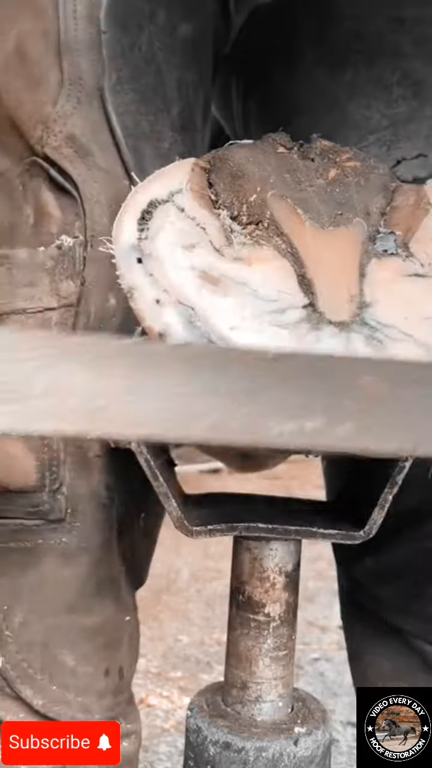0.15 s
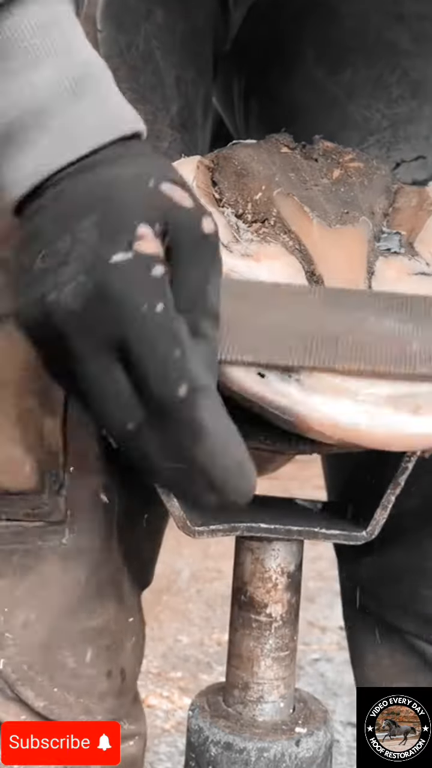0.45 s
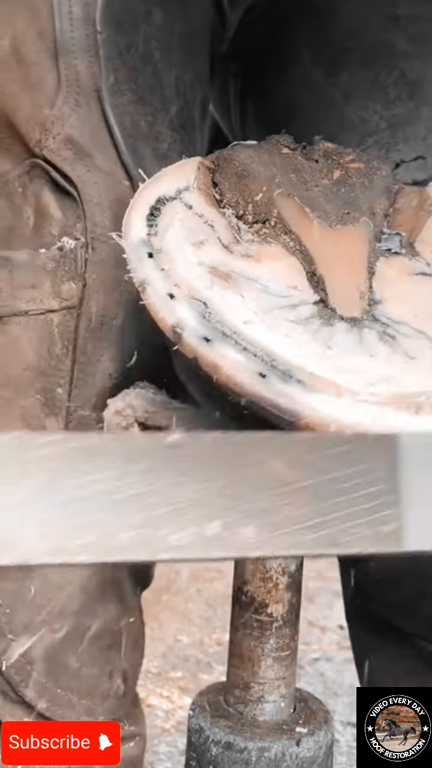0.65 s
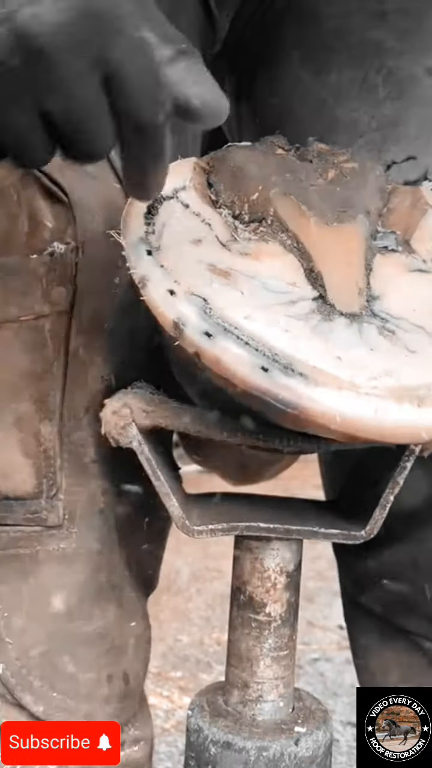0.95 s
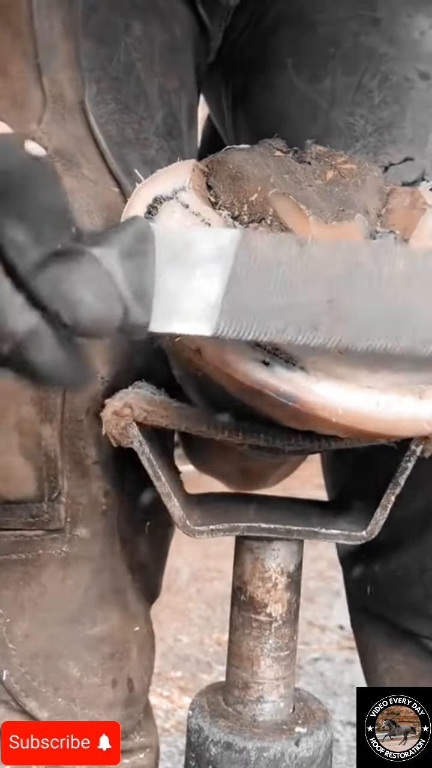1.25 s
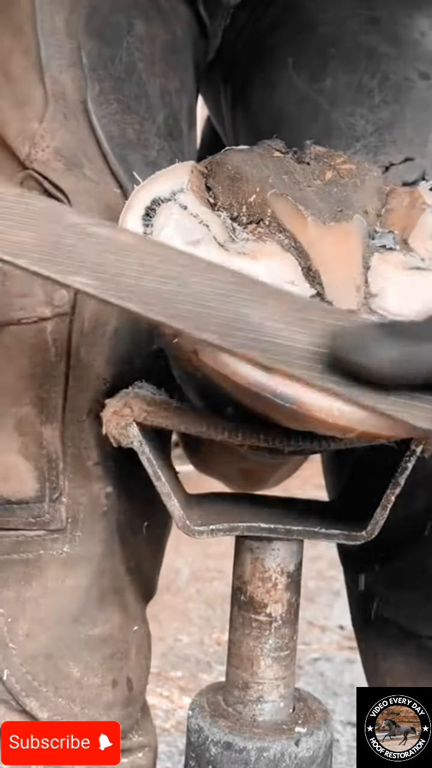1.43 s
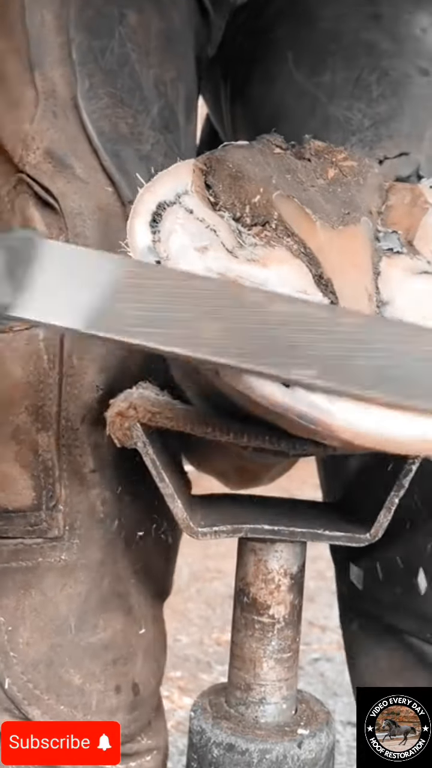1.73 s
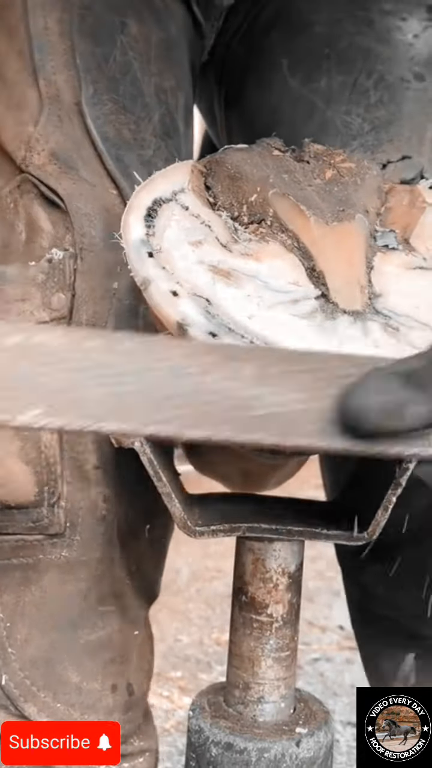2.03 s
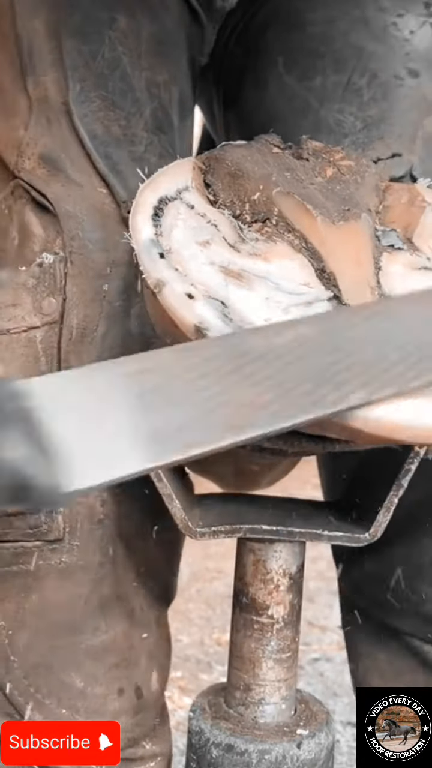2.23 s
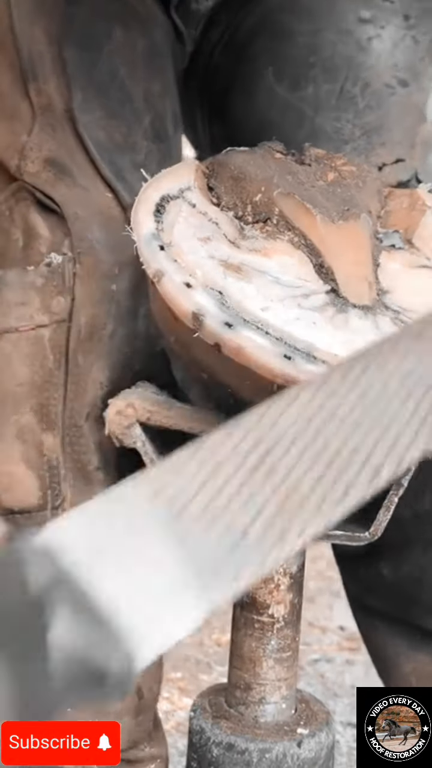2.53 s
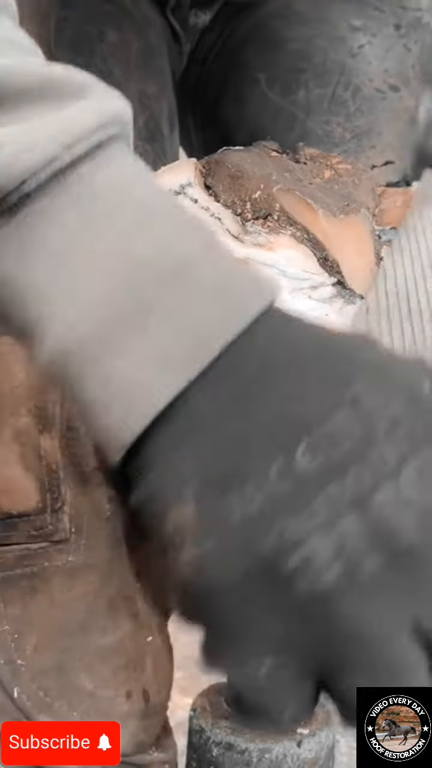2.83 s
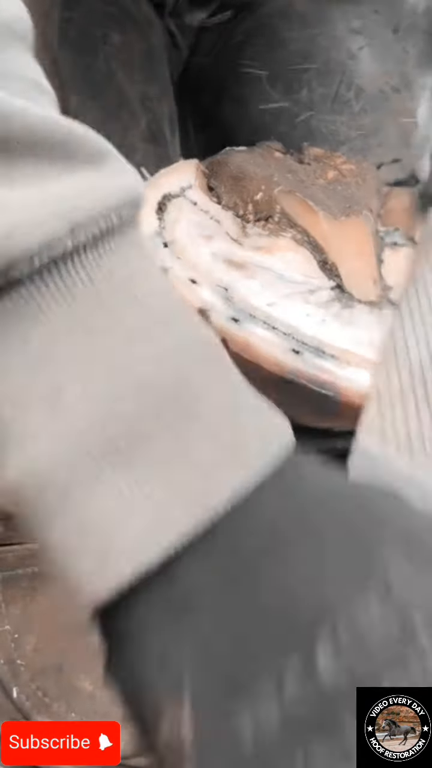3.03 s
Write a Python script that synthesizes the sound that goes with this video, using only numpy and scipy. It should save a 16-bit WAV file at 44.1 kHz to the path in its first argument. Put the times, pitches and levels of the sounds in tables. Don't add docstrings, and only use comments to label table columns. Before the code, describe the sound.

A metal rasp grates on a horse hoof, close and dry. Hard, bright, gritty pushes at 0.05 and 0.45 s stop abruptly, with a faint return between. Ticks from 0.9 s, a hoof knock near 1.25 and a singing draw with low wind follow. From 1.55 s pushes and lighter draws alternate, loudest at 2.2; teeth rattle at 2.4, scuffs at 3.1. Soft stand thuds, low barn rumble, thin warbly treble.

```python
import sys
import numpy as np
from scipy import signal
from scipy.fft import rfft, irfft, next_fast_len
from scipy.io import wavfile
from scipy.ndimage import uniform_filter1d, map_coordinates

SR = 44100
rng = np.random.default_rng(int(sys.argv[2]) if len(sys.argv) > 2 else 0)


def makeup_ratio(level_db):
    decades = np.asarray(level_db, float) / 20
    return 10 ** decades


def output_pcm(signal):
    pcm = np.clip(np.atleast_2d(signal).T, -1, 1) * 32767
    wavfile.write(sys.argv[1], SR, np.round(pcm).astype(np.int16))


N = 140238

# frequency [Hz], level [dB].
BARN_RUMBLE = [(22, -34), (70, -14.5), (120, -1.5), (180, 1), (350, -15.5), (560, -16.5), (720, -30)]
# centre [Hz], half width [Hz], lift [dB].
BARN_BOOMS = [(121.6, 2.85, 9.5), (161, 30, -0.5), (339.3, 29, 6.5)]
# frequency [Hz], level [dB per Hz].
AIR_SPECTRUM = [(500, -48), (850, -9), (983, -11), (1560, -11), (1900, -17.5), (3200, -26), (3830, -21.5),
                (15500, -40.5)]
# time [s], level [dB].
GUSTS = [(0.0, -64), (0.51, -70), (1.29, -48.5), (1.5, -44), (1.96, -59.5), (2.67, -69), (3.18, -55)]
# centre [s], level [dB], pitch [Hz], half length [s].
STAND_THUDS = [(.173, -31, 64.6, 0.013), (.165, -38, 165.2, 0.047), (.592, -32.5, 172.6, 0.016),
               (1.07, -42.5, 58.7, 0.042), (1.282, -32.5, 171, 0.012), (1.44, -37, 64, 0.012),
               (1.592, -25, 86.4, 0.015), (1.79, -39.5, 184, 0.034), (2.455, -33.5, 157, 0.023),
               (2.99, -37.5, 180, 0.017), (3.17, -45, 45, 0.028)]
# frequency [Hz], level [dB], decay t60 [s].
KNOCK_MODES = [(600, -42, .025), (840, -40.5, 0.029), (1070, -42, 0.024), (1400, -39, .022),
               (2000, -44, .012)]
# start [s], level [dB], centre [Hz], decay t60 [s].
TOUCHDOWNS = [(0.9012, -47.5, 3740, 0.036), (.905, -52, 3000, 0.044), (.916, -43.5, 4000, 0.031),
              (1.004, -60, 4000, .02), (1.188, -50, 2200, .03), (1.205, -50, 2300, 0.0074),
              (1.213, -42, 2370, 0.019), (1.27, -52, 1500, 0.017), (1.3, -50, 2200, 0.022),
              (1.3165, -44, 2600, .015), (2.093, -49.5, 1800, 0.026), (3.041, -41, 9000, .006),
              (3.061, -38, 3360, 0.023), (3.085, -33.5, 2920, 0.012), (3.102, -50, 2000, .01),
              (3.154, -43, 3000, .015)]
# start [s], level [dB], centre [Hz].
TOOTH_ROWS = [(2.396, -42, 4500), (2.4045, -39.5, 3305), (2.4127, -41, 3000), (2.4205, -34, 3950),
              (2.427, -35, 4560), (2.4344, -29.5, 6000), (2.4403, -28, 4300), (2.45, -31, 6006),
              (2.465, -32, 3540), (2.471, -27, 3310), (2.477, -34, 3610)]
# on [s], off [s], from [Hz], to [Hz], width [Hz],
# level against the rasp [dB].
BLADE_SINGS = [(0.046, 0.15, 3600, 4400, 900, -9.5), (.47, 0.58, 3670, 3950, 1100, -6),
               (1.28, 1.44, 2440, 2040, 200, -5), (1.31, 1.38, 3900, 3700, 250, -6),
               (1.38, 1.46, 5200, 5000, 360, -8.5), (1.333, 1.47, 9000, 8960, 320, -8.5),
               (1.62, 1.78, 8500, 9000, 260, -9), (1.89, 2.01, 4150, 5200, 1100, -12.5),
               (1.93, 2.16, 9400, 8200, 300, -15), (2.16, 2.13, 4800, 4300, 1400, -2),
               (2.2, 2.308, 3520, 3450, 440, -3.5), (2.27, 2.32, 2740, 2380, 310, -3.5),
               (2.679, 2.779, 3900, 3600, 670, -6), (1.579, 1.68, 640, 670, 300, -15),
               (1.29, 1.43, 340, 290, 99, -2)]
# time [s], tooth pressure [dB].
PUSHES = [
    [(0, -63.5), (.055, -40), (.1, -35.5), (.126, -36), (.133, -55.5), (.175, -52.5), (.19, -65.5),
     (.26, -69)],
    [(.43, -69), (.48, -44), (.53, -40), (.575, -43.5), (.61, -55.5), (.64, -73), (.75, -61.5), (.88, -84)],
    [(1.54, -73), (1.57, -53.5), (1.66, -39.5), (1.765, -35), (1.775, -44.5), (1.8, -68), (1.84, -67)],
    [(2.07, -69), (2.095, -59.5), (2.14, -41.5), (2.2, -32), (2.292, -31.5), (2.3, -45.5), (2.335, -53.5),
     (2.36, -68)],
    [(2.61, -73), (2.645, -49), (2.71, -38.5), (2.735, -36), (2.77, -39), (2.855, -46.5), (2.88, -73)],
    [(2.92, -75), (2.98, -51), (3.04, -50), (3.06, -49.5), (3.088, -50), (3.1, -71)],
]
# time [s], tooth pressure [dB].
DRAWS = [
    [(.26, -67), (.31, -56.5), (.35, -46.5), (.4, -60), (.425, -86)],
    [(1.07, -93), (1.12, -65), (1.19, -56.5), (1.225, -55.5), (1.25, -71)],
    [(1.26, -61), (1.3, -59), (1.34, -46.5), (1.45, -42), (1.49, -48.5), (1.515, -63)],
    [(1.85, -79), (1.88, -53.5), (1.93, -43), (1.98, -43.5), (2.04, -48), (2.062, -70)],
    [(2.37, -70), (2.4, -58.5), (2.44, -42.5), (2.47, -40), (2.51, -43), (2.585, -63), (2.61, -84)],
    [(3.13, -62), (3.15, -45.5), (3.18, -44)],
]
# body [dB], bite [dB], treble [dB].
STROKE_COLOURS = [(9.5, -4.5, 5), (9, -3.8, 5.5), (10.5, -3.5, 3.5), (3, -3.5, 3.5), (4, 1, 2),
                  (17.5, 4.5, 1.5), (16.5, 1.5, 1), (12, -5, 3), (12.5, -7, -1), (7, -10, -2.5),
                  (6.5, 0.5, 7.5), (6, -5.5, -2)]
# frequency [Hz], level [dB].
HORN_SPECTRUM = [(300, -9.5), (900, -16), (1400, -6.5), (2500, -0.25), (4000, 0), (5600, -10.5),
                 (9000, -12.5), (12500, -23)]
# centre [Hz], half width [Hz], lift [dB].
BLADE_MODES = [(1700, 250, 0), (2320, 140, 1.5), (3580, 110, 2), (5160, 600, 7), (8660, 120, 3),
               (12580, 640, 7)]
# frequency [Hz], likeness [-1 to 1].
PORT_LIKENESS = [(60, 0.86), (150, 0.95), (300, 0.8), (640, -0.49), (1400, 0.58), (3100, 0.78),
                 (6800, 0.56), (15000, 0.28)]
# frequency [Hz], left minus right [dB].
PORT_LEAN = [(60, 0.5), (130, -1.5), (290, -5), (640, -3), (1410, 0), (3100, -4), (6820, -2.0),
             (15000, 0.5)]
# centre [Hz], half width [Hz], gain [dB].
SPECTRUM_BUMPS = [(717.6, 46, -14.5), (5830, 330, -4.5), (9210, 62, 7.5), (11370, 80, -5)]
WHISTLE_HZ = (9819, 11197, 13954)
EMPTIED_HZ = (280, 550, 700)
# on [s], off [s], level against the rasp [dB].
WHISTLE_TIMES = [
    [(0.486, 0.873, -14), (1.274, 1.53, -15), (1.57, 1.784, -13), (1.86, 2.06, -16), (2.12, 2.32, -19),
     (2.43, 2.65, -23)],
    [(1.3, 1.53, -26), (2.19, 2.3, -18.5), (2.74, 3.183, -26)],
    [(.05, .4, -36), (.5, .88, -29), (.96, 1.16, -32), (1.43, 1.53, -38), (2.47, 2.6, -28),
     (2.66, 2.71, -36)],
]
# (from [s], to [s]).
TREBLE_GAPS = [([(5880, 6250), (11350, 11720)], [(.13, .76), (.95, 1.25), (1.31, 1.45), (1.6, 1.98),
               (2.13, 2.26), (2.46, 2.6), (2.65, 2.79), (2.87, 3.02), (3.07, 3.12)]), ([(5720, 5900)],
               [(.01, .89), (1, 1.11), (1.21, 2.07), (2.14, 2.38), (2.46, 2.79), (2.89, 3.17)]),
               ([(10000, 10700)], [(.17, .43), (.54, .6), (.63, .92), (1.03, 1.2), (1.25, 1.53),
               (1.58, 1.63), (1.66, 1.74), (1.81, 2.05), (2.12, 2.29), (2.47, 2.53), (2.65, 2.71),
               (2.76, 3.04)]), ([(14600, 15200)], [(.06, .41), (.5, .89), (1.49, 1.62), (1.82, 2.07),
               (2.51, 2.57)]), ([(15200, 15800)], [(.06, .89), (.96, 1.15), (1.19, 2.08), (2.14, 2.3),
               (2.45, 2.62), (2.78, 3.2)])]


def unit(x):
    return x / np.sqrt(np.mean(x ** 2) + 1e-20)


def noise():
    return rng.standard_normal((2, N))


def along(points, hz):
    f, v = np.transpose(points)
    below = -120 if v[0] < -15 else v[0]
    return np.interp(np.log(hz + 1), np.log(f + 1), v, below, v[-1])


def bumps(rows, hz):
    return makeup_ratio(sum(db * np.exp(-((hz - c) / w) ** 2) for c, w, db in rows))


def wobble(rate):
    knots = rng.standard_normal(int(N * rate / SR) + 4)
    return map_coordinates(knots, [np.arange(N) * rate / SR])


def filtered(x, response):
    m = next_fast_len(N + 8192)
    return irfft(rfft(x, m) * response(np.fft.rfftfreq(m, 1 / SR)), m)[..., :N]


def patchy(x, patch_db):
    z = signal.stft(x, nperseg=512)[2]
    field = rng.standard_normal(z.shape[-2:])
    for axis in (0, 1):
        field = uniform_filter1d(field, size=5, axis=axis)
    return signal.istft(z * makeup_ratio(patch_db * unit(field)), nperseg=512)[1][..., :N]


def barn():
    rumble = filtered(noise(), lambda hz: makeup_ratio(along(BARN_RUMBLE, hz)) * bumps(BARN_BOOMS, hz) * (hz < 715))
    rumble = unit(rumble)
    power = abs(uniform_filter1d(rumble ** 2, size=2400, axis=1))
    rumble = unit(rumble / power ** (0.35 / 2))
    air = patchy(noise(), patch_db=2.5)
    air = unit(filtered(air, lambda hz: makeup_ratio(along(AIR_SPECTRUM, hz)) * (hz > 860)))
    gust = unit(filtered(noise(), lambda hz: np.exp(-((hz - 58) / 22) ** 2)))
    s, db = np.transpose(GUSTS)
    gust_db = np.interp(np.arange(N) / SR, s, db) + 2.5 * wobble(9.25)
    return makeup_ratio(-45.5) * patchy(rumble, patch_db=1.5) + makeup_ratio(-64) * air + makeup_ratio(gust_db) * gust


def stand():
    t, out = np.arange(N) / SR, 0
    for s, db, hz, half in STAND_THUDS:
        bell = np.exp(-((t - s) / half) ** 2)
        out = out + makeup_ratio(db) * bell * np.sin(2 * np.pi * hz * (t - s) + 4.13)
    return out


def knock():
    t = np.maximum(np.arange(N) / SR - 1.2555, 0)
    return sum(makeup_ratio(db - 60 * t / t60) * np.sin(2 * np.pi * hz * t) for hz, db, t60 in KNOCK_MODES)


def ticks():
    out, t = np.zeros((2, N + SR)), np.arange(4096) / SR
    f = np.fft.rfftfreq(len(t), 1 / SR)
    row_t60_s = 0.0076
    for s, db, hz, t60 in TOUCHDOWNS + [(*row, row_t60_s) for row in TOOTH_ROWS]:
        patch = (f > 500) / (1 + ((f - hz) / (0.5 * hz)) ** 2)
        puff = irfft(rfft(rng.standard_normal((2, len(t)))) * patch)
        out[:, round(s * SR):][:, :len(t)] += makeup_ratio(db - 60 * t / t60) * unit(puff)
    return out[:, :N]


def singing(plain, teeth_per_s):
    t, out = np.arange(N) / SR, 0
    for on, off, from_hz, to_hz, width_hz, db in BLADE_SINGS:
        u = np.clip((t - on) / (off - on), 0, 1)
        strikes = rng.random((2, 2, N)) < 0.3 * teeth_per_s / SR
        strikes = rng.standard_normal((2, 2, N)) * strikes
        a, b = filtered(strikes, lambda hz: 1 / (1 + (2 * hz / width_hz) ** 2))
        turn = 2 * np.pi * np.cumsum(from_hz + (to_hz - from_hz) * u) / SR
        ring = unit(a * np.cos(turn) + b * np.sin(turn))
        out = out + makeup_ratio(db + 1.8 * wobble(70)) * np.sqrt(np.sin(np.pi * u).clip(0)) * ring
    return out * plain


def pressure():
    t, gains = np.arange(N) / SR, 0
    for rows, colour_db in zip(PUSHES + DRAWS, STROKE_COLOURS):
        s, db = np.transpose(rows)
        gains = gains + np.outer(makeup_ratio([0, *colour_db]), makeup_ratio(np.interp(t, s, db, -120, -120)))
    return gains


def rasp():
    teeth_per_s, size_db, hiss_share, clump_db = 3500, 6, 0.55, 0.6
    plain, body, sharp, treble = pressure()
    bites = rng.random((2, N)) < teeth_per_s / SR
    size = np.minimum(rng.exponential(size=(2, N)), 1.7)
    chips = unit(bites * makeup_ratio(size_db * size) * noise())
    clumps = makeup_ratio(clump_db * (wobble(300) + 0.94 * wobble(60)))
    grit = (chips * (1 - hiss_share) + hiss_share * noise()) * clumps
    grit = patchy(grit, patch_db=2)
    grit = unit(filtered(grit, lambda hz: makeup_ratio(along(HORN_SPECTRUM, hz)) * bumps(BLADE_MODES, hz)))
    a, b, c = [filtered(grit, lambda hz: 1 / (1 + (edge_hz / (hz + 1)) ** 8))
               for edge_hz in (1200, 3200, 6000)]
    strokes = (grit - a) * body + (a - b) * plain + (b - c) * sharp + c * treble
    return strokes + singing(plain, teeth_per_s)


def shed(x):
    t = np.arange(SR // 4) / SR
    tail = rng.standard_normal((2, len(t))) * makeup_ratio(-60 * t / 0.088)
    return signal.fftconvolve(x, tail / np.linalg.norm(tail[0]), axes=1)[:, :N]


def stereo(pair):
    def split(hz):
        turn = np.arccos(np.clip(along(PORT_LIKENESS, hz), -1, 1)) / 2
        return np.array([np.cos(turn), np.sin(turn)])

    mid, side = filtered(pair, split)
    sides = np.array([mid + side, mid - side])
    return filtered(sides, lambda hz: makeup_ratio(np.outer([0.5, -0.5], along(PORT_LEAN, hz))))


def scene():
    near = rasp() + ticks() + knock() * makeup_ratio([[0], [-8]])
    thuds = stand()
    return stereo(near + makeup_ratio(-11) * shed(near) + barn() + np.array([thuds, 0.4 * thuds]))


def shape_spectrum(x):
    low_cut_hz, top_hz = 29.4, 15700
    return filtered(x, lambda hz: bumps(SPECTRUM_BUMPS, hz) * (hz < top_hz)
                    / (1 + (low_cut_hz / (hz + 1)) ** 4))


def gaps_and_whistles(x):
    empty_db, flutter_db, fade_s = -55, 3.5, 0.012
    t, tones = np.arange(N) / SR, 0
    level = np.sqrt(abs(uniform_filter1d(filtered(x, lambda hz: hz > 1500) ** 2, size=1024, axis=1)))
    hz, s, z = signal.stft(x, SR, nperseg=1024)
    keep = np.ones(z.shape[1:])
    for c_hz, half_hz, rows in zip(WHISTLE_HZ, EMPTIED_HZ, WHISTLE_TIMES):
        for on, off, db in rows:
            keep[np.ix_(abs(hz - c_hz) < half_hz, (s > on) & (s < off))] = makeup_ratio(empty_db)
            fade = np.clip(np.minimum(t - on, off - t) / fade_s, 0, 1)
            gain = makeup_ratio(db + flutter_db * np.round(wobble(45)))
            tones = tones + gain * fade * np.sin(2 * np.pi * c_hz * t)

    def inside(v, pairs):
        return np.any([(v > a) & (v < b) for a, b in pairs], axis=0)

    for bands, spans in TREBLE_GAPS:
        keep[np.ix_(inside(hz, bands), inside(s, spans))] = makeup_ratio(empty_db)
    return signal.istft(z * keep, SR, nperseg=1024)[1][:, :N] + level * tones


def top_cut(x):
    return signal.sosfilt(signal.butter(12, 15700, fs=SR, output="sos"), x)


def record(dry):
    mix = gaps_and_whistles(shape_spectrum(dry))
    return top_cut(mix)


dry = scene()
out = record(dry)
output_pcm(out)
```